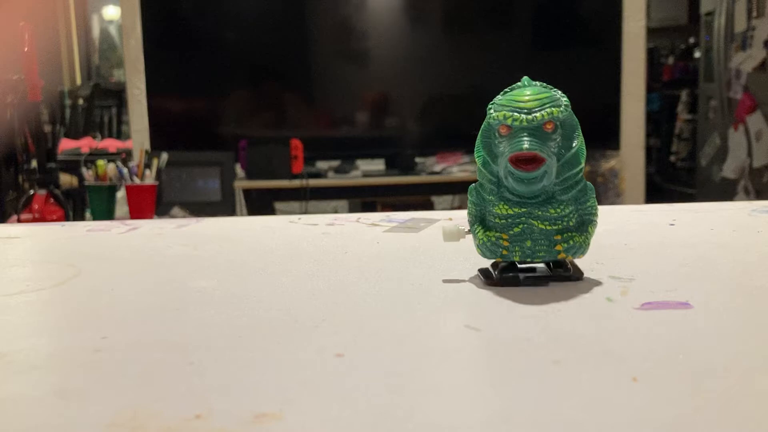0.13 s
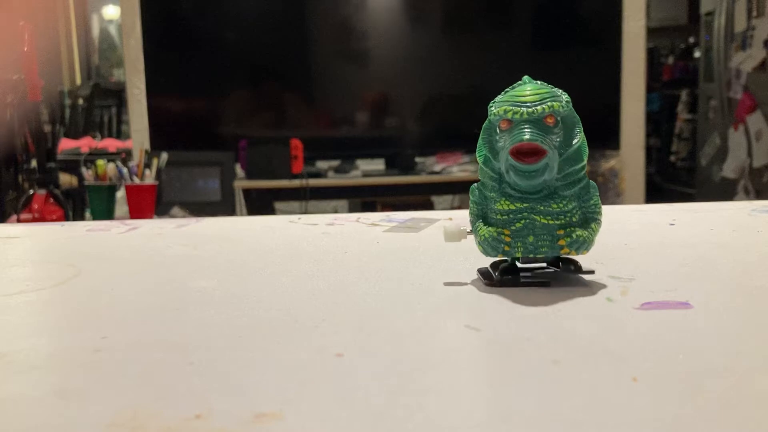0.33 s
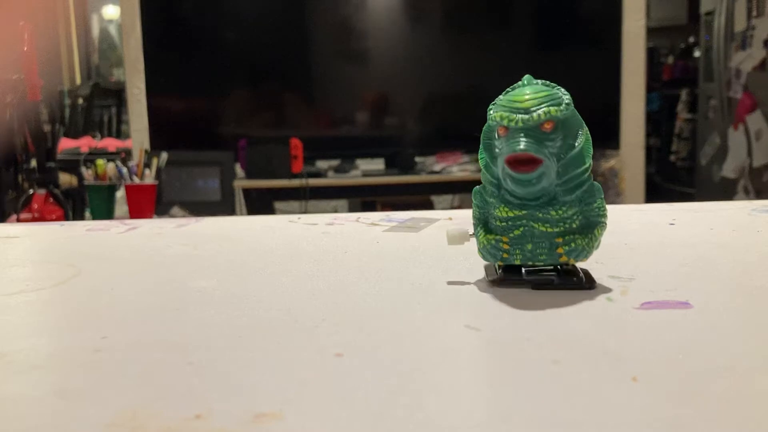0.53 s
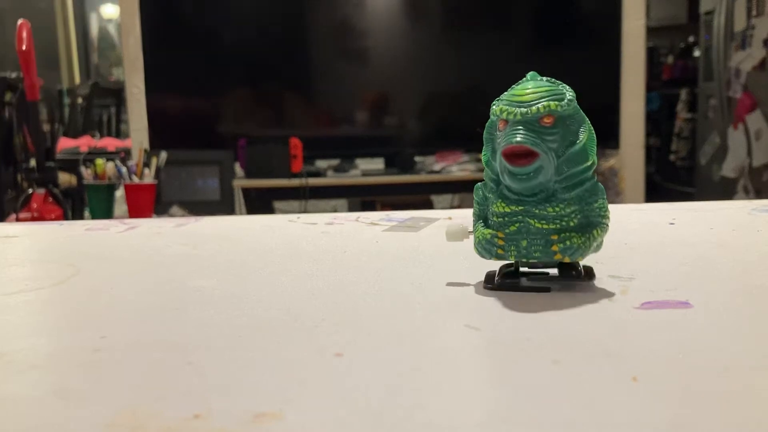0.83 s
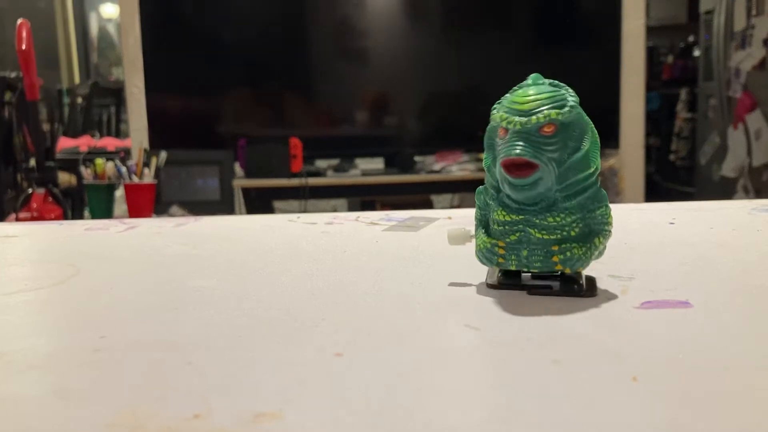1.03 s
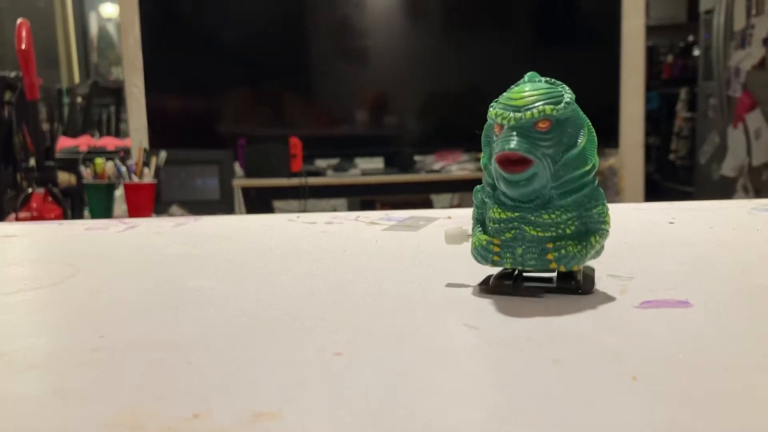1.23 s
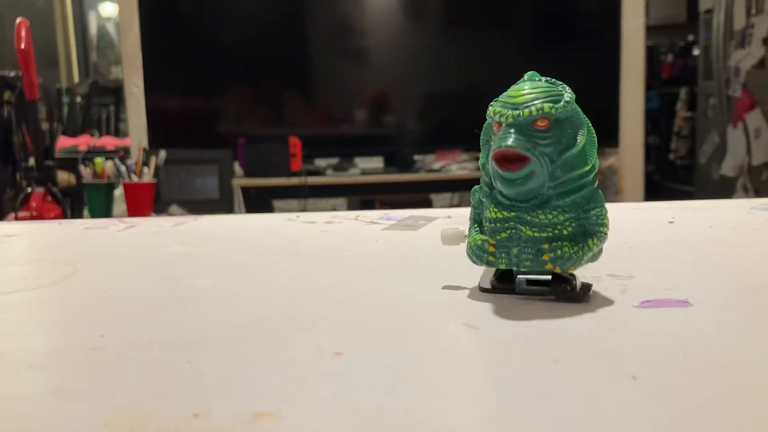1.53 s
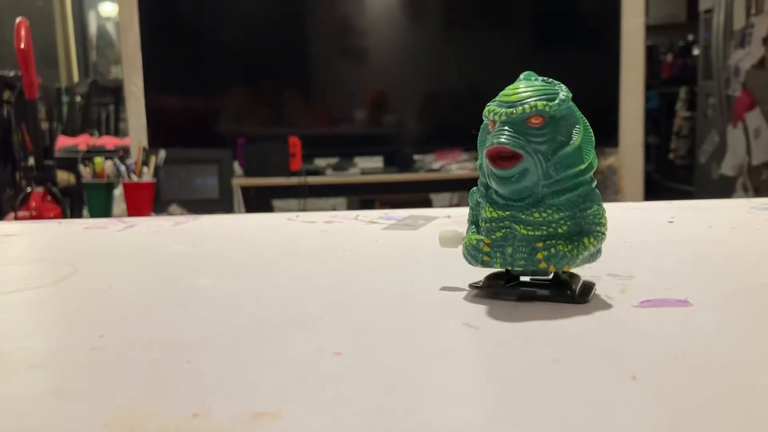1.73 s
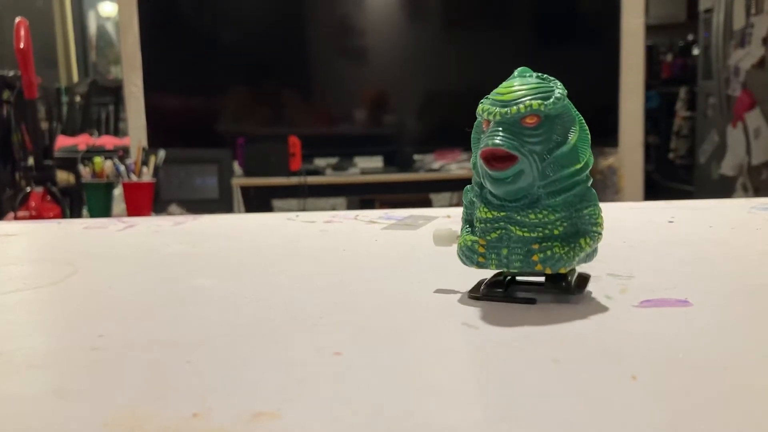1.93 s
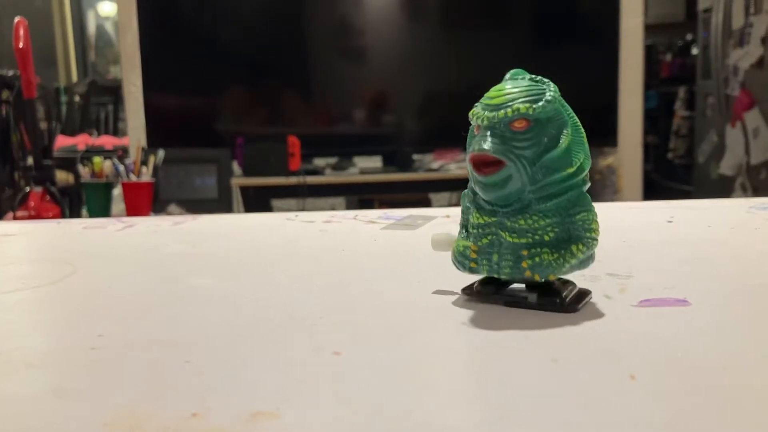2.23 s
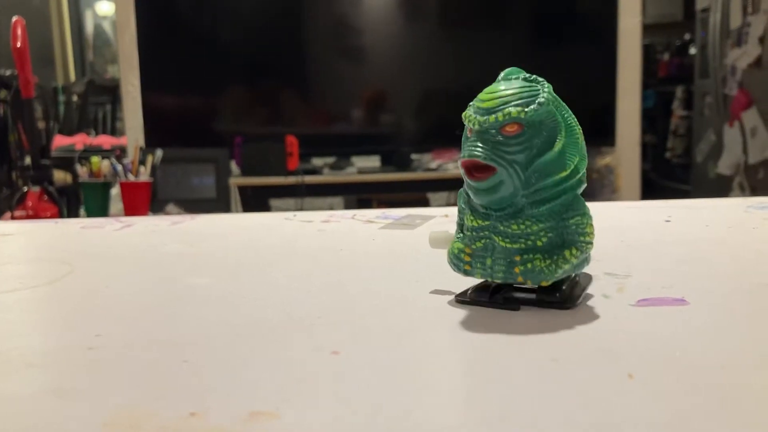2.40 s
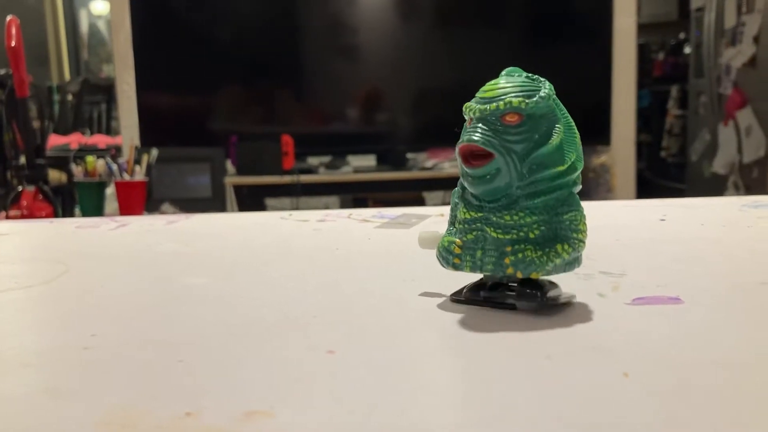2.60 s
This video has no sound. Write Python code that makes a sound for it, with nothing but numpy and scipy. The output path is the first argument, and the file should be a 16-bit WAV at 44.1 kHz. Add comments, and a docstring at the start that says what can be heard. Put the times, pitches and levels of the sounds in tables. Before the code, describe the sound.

Continuous bright, rattling clockwork buzz of a small walking toy, starting abruptly and running throughout, with brief stalls and snaps at each step; close and dry, slight table reflection, very faint indoor hum behind.

```python
"""A small plastic wind-up toy waddles on a table, close to a two-port microphone in a quiet room. Its
escapement rocks about 147 times a second, two blows per tooth ringing in the hollow shell and the table. Twice
in every step the gears almost stall, then catch again with a snap; wavering gear tones follow the speed. The
blows are short noise rings with rattle and rubbing, heard directly, off the table and as a diffuse stereo wash.
Behind the toy lie a low room rumble, made of shaped noise, and steady mains hum, made of sines."""
import sys
import numpy as np
from scipy import signal
from scipy.fft import rfft, irfft, next_fast_len
from scipy.io import wavfile

SR = 44100
rng = np.random.default_rng(int(sys.argv[2]) if len(sys.argv) > 2 else 0)


def master(y):
    """Save y as 16-bit WAV."""
    cut = np.clip(np.atleast_2d(y).T, -1, 1)
    pcm = np.round(cut * 32767)  # scale
    wavfile.write(sys.argv[1], SR, pcm.astype(np.int16))


N = 121716

# escapement speed, surging and sagging several times a step: (time [s], speed [teeth/s])
ESCAPEMENT_SPEED = [(0.08, 149), (0.14, 149), (0.17, 141), (0.22, 151), (0.3, 160), (0.34, 147),
                    (0.395, 159), (0.429, 146), (0.584, 155), (0.649, 142), (0.724, 143), (0.849, 155),
                    (0.893, 139), (0.943, 157), (0.983, 143), (1.043, 151), (1.143, 148), (1.228, 140),
                    (1.253, 146), (1.273, 137), (1.402, 157), (1.457, 147), (1.522, 153), (1.547, 140),
                    (1.637, 157), (1.682, 146), (1.702, 153), (1.771, 140), (1.796, 150), (1.841, 138),
                    (1.901, 152), (1.976, 153), (2.016, 138), (2.076, 157), (2.106, 134), (2.151, 153),
                    (2.195, 138), (2.265, 145), (2.35, 136), (2.385, 140), (2.41, 135), (2.555, 151),
                    (2.59, 133), (2.659, 150), (2.689, 136), (2.739, 140)]
# gears binding and catching: (release time [s], depth [dB], length of slowing [s], snap of the catch [dB])
GEAR_STALLS = [(.473, 16, .015, -9), (.525, 16, .018, 1), (1.027, 10, .016, -10), (1.085, 16, .026, -3),
               (1.590, 15, .018, -6), (1.646, 18, .02, -1), (2.154, 11, .018, -6), (2.2099, 23, .017, -1),
               (2.738, 19, .018, 1)]
# low knocking, below 1550 Hz: (time [s], level [dB])
KNOCK_LEVEL = [(0.08, -1.8), (1.0, 1), (2.75, .5)]
# rasp near 2 kHz: (time [s], level [dB])
RASP_LEVEL = [(0.08, 2.5), (0.41, 3.4), (0.68, -1.5), (1.52, -1), (2.36, -2.9), (2.39, 0.7), (2.75, -4)]
# clatter of the shell: (time [s], level [dB])
CLATTER_LEVEL = [(0.08, -.5), (0.32, 1.8), (0.71, -1.5), (0.86, 2.5), (0.89, -0.1), (1.19, -2.5), (1.37, 1),
                 (1.61, -1.5), (1.85, -1.7), (1.97, 2.5), (2.0, -0.7), (2.42, -2.4), (2.54, 3),
                 (2.61, -2.5)]
# bright buzz: (time [s], level [dB])
BUZZ_LEVEL = [(0.08, -0.9), (0.38, 1.5), (0.44, -1.8), (0.47, 3), (0.74, -2.5), (1.25, 1.3), (1.28, -4.5),
              (1.4, 0.5), (1.46, -1.55), (1.701, 2.8), (1.85, -2.5), (1.97, 1), (2.21, 0.5), (2.45, -1.5),
              (2.54, 1), (2.75, -1.9)]
# finest ticks, above 8800 Hz: (time [s], level [dB])
TICK_LEVEL = [(0.08, -3.4), (0.17, -6), (0.319, -1.5), (0.5, -4), (0.59, -1.4), (0.65, -6), (0.829, 1),
              (1.28, -1.8), (1.4, 1), (1.7, 0.7), (1.76, -2.5), (1.94, 0.5), (2.39, -0.5), (2.45, 2.5),
              (2.6, 1.3), (2.72, 4.5)]
# broad colour of toy and table: (frequency [Hz], relative density [dB per Hz])
BODY_COLOUR = [(250, -27.5), (490, -30.5), (750, -16.5), (1000, -12.5), (1400, -12), (1700, -19.5),
               (2200, -18.5), (3050, -19.5), (3600, -16), (4400, -1), (5200, -14), (5900, -5), (8600, -10),
               (10500, -2.5), (12500, -7.5), (15700, -14)]
# resonances of toy and table: (frequency [Hz], width [Hz], lift [dB])
BODY_RESONANCES = [(617, 76, 7.5), (828, 47, 6), (875, 84, 6), (2700, 310, 7.3), (4064, 110, 5.5),
                   (4450, 107, 4.5), (4795, 64, 6), (6635, 130, 6.5), (7740, 250, 3.5), (11370, 350, 4)]
# rings that swell and fade as the toy turns: (frequency [Hz], width [Hz], lift as (time [s], level [dB]))
TURNING_RINGS = [(2850, 180, [(.6, 4), (1.2, 0)]), (4300, 220, [(.32, 5), (.55, -1.5)]),
                 (4750, 220, [(.8, -5), (1.4, 1)]), (5900, 300, [(.33, 5), (.55, -3), (1.1, -6)]),
                 (6600, 200, [(.35, -4), (.55, 3), (.9, -2), (1.15, 2), (1.8, 3), (2.2, -6)]),
                 (7050, 220, [(1.9, -2), (2.3, 4)]), (7780, 220, [(.5, -5), (1.2, 3), (2.4, -1)])]
# phase between the microphone ports: (frequency [Hz], lead of the left port [rad])
PORT_LEAD = [(300, 0), (1500, .1), (1950, 1.5), (2650, .05), (3300, 1.6), (4000, 1.9), (4500, 2.8),
             (4900, 1.4), (5400, 1.5), (5950, 1.9), (6600, 1.1), (7400, .05), (8000, -1.1), (8500, -3.05),
             (9500, -3.2), (9750, -4.1), (11300, -6.28), (12400, -7.4), (13000, -8.1), (13300, -9.35),
             (14450, -9.5), (14700, -10.6), (15400, -12.3)]
# diffuse stereo wash against the direct sound: (frequency [Hz], level [dB])
WASH_LEVEL = [(300, -11), (900, -13.5), (2000, -7), (2700, -10), (3500, -6.5), (4500, -10.5),
              (5400, -6.5), (6500, -8), (7800, -13), (8600, -38), (9450, -39), (10200, -19),
              (11300, -24), (12600, -12), (13400, -34), (14400, -28), (15500, -24)]
# tones of the gear train: (multiple of the tooth rate, level before wavering and stalls [dB])
GEAR_TONE_LEVELS = [(4, -64.5), (5, -61), (6, -54), (7, -62.5), (9, -65)]
# room rumble: (frequency [Hz], relative density [dB per Hz])
RUMBLE_COLOUR = [(24, -42), (40, -16), (65, -3), (85, -2), (150, -2), (220, -9.5), (450, -10), (1000, -17),
                 (4000, -39)]
# mains hum: (frequency [Hz], level midway between the ports [dB])
MAINS_HUM = [(120, -59.5), (238, -70)]

TOY_DB = -31.5
RETURN_SHARE = .43   # the second pallet strikes this far into the tooth
JITTER_S, STRIKE_SPREAD_DB = .00009, 1.04   # standard deviations of timing and force
CATCH_S = .00067   # longest time the gears take to pick up again
BLOW_LIMIT = 3.76   # soft limit on the force of contact, in multiples of the rms
ECHO_S, ECHO_SWAY_S, ECHO_DB = .0011, .00012, -13.5   # bounce off the table
STEP_S = .563   # one rocking cycle
WASH_T60_S = .12
GEAR_WAVER_DB, GEAR_WAVER_PER_S, GEAR_SLOP_RAD = 2.5, 45, .3   # level spread, rate, phase spread
RUMBLE_DB, RUMBLE_SIDE_DB = -60.5, -7.5   # the side part is relative to the middle
START_S, CUTOFF_HZ = .073, 15780

T = np.arange(N) / SR
SIZE = next_fast_len(N + SR // 2)
HZ = np.arange(SIZE // 2 + 1) * SR / SIZE + 1e-6


def from_db(db):
    """Decibels to gain."""
    return 10 ** (np.asarray(db) / 20)


def rms_one(x):
    """Scale to unit rms."""
    return x / np.sqrt(np.mean(x ** 2) + 1e-20)


def in_time(rows, s):
    """Read a curve at the given times."""
    return np.interp(s, *np.transpose(rows))


def over_hz(rows):
    """Read a spectrum on the frequency grid, along a logarithmic axis."""
    hz, value = np.transpose(rows)
    return np.interp(np.log(HZ), np.log(hz), value)


def teeth():
    """Teeth passed since the start: the running sum of the escapement speed."""
    return np.cumsum(in_time(ESCAPEMENT_SPEED, T)) / SR


def strikes():
    """Times, levels and pallet (0 or 1) of the escapement's blows; stalls weaken them and end with a snap."""
    k = np.arange(900)   # more than enough blows; those past the end are dropped
    pallet = k % 2
    chance = rng.standard_normal((len(k), 2))
    s = np.interp(k // 2 + RETURN_SHARE * pallet, teeth(), T, right=2 * T[-1])
    s = s + JITTER_S * chance[:, 0]
    db = STRIKE_SPREAD_DB * chance[:, 1] + stall_db(s)
    snaps = [(release, snap_db, 0) for release, _, _, snap_db in GEAR_STALLS]
    rows = np.vstack([np.column_stack([s, db, pallet]), snaps])
    return rows[(rows[:, 0] > 0) & (rows[:, 0] < T[-1])].T


def even_ring(decay):
    """A short ring of noise whose spectrum is even, shaped towards the given decay."""
    ring = rng.standard_normal(len(decay))
    for _ in range(8):   # alternate between the decay in time and a flat spectrum
        spectrum = rfft(np.sign(ring) * decay)
        ring = irfft(np.exp(1j * np.angle(spectrum)))
    return ring


def register(blows, level, lag_s, ring_s, return_db, spread_db, loose, rub_db):
    """Blows give one repeated ring and a loose rattle over rubbing gears; rows: direct, left and right wash."""
    s, db, pallet = blows
    blow_db = db + return_db * pallet + spread_db * rng.standard_normal(N)[:len(s)]
    clicks = np.zeros(N)
    clicks[np.clip(((s + lag_s) * SR).astype(int), 0, N - 1)] = from_db(blow_db)
    age = T[:2048]
    decay = np.exp(-age / ring_s) * (1 - np.exp(-6 * age / ring_s))
    firm = rms_one(signal.fftconvolve(clicks, even_ring(decay))[:N])
    rattle_power = abs(signal.fftconvolve(clicks ** 2, decay ** 2)[:N])
    rattle = rms_one(np.sqrt(rattle_power) * rng.standard_normal(N))
    rub = from_db(rub_db + stall_db(T)) * rng.standard_normal(N)
    contact = rms_one(np.sqrt(1 - loose) * firm + np.sqrt(loose) * rattle + rub)
    limited = rms_one(np.tanh(contact / BLOW_LIMIT))
    direct = limited * from_db(in_time(level, T))
    return rfft(np.vstack([with_table_echo(direct), stereo_wash(direct)]), SIZE)


def body():
    """Response of shell and table: a broad colour lifted by resonances; unit power."""
    response = from_db(over_hz(BODY_COLOUR)) + 0j
    for hz, width, db in BODY_RESONANCES:
        response = response * (1 + (from_db(db) - 1) / (1 + 2j * (HZ - hz) / width))
    return response / np.sqrt(np.mean(abs(response) ** 2))


def toy():
    """Spectrum of the blows in five registers of the body; the finest ticks come first and die fastest."""
    blows = strikes()
    registers = [
        register(blows, KNOCK_LEVEL, lag_s=.0002, ring_s=.0016, return_db=-2, spread_db=1,
                 loose=.25, rub_db=-11),
        register(blows, RASP_LEVEL, lag_s=.00023, ring_s=.0012, return_db=-6.5, spread_db=.5,
                 loose=.3, rub_db=-20.5),
        register(blows, CLATTER_LEVEL, lag_s=.0003, ring_s=.0019, return_db=-8, spread_db=1.01,
                 loose=.35, rub_db=-9),
        register(blows, BUZZ_LEVEL, lag_s=.0001, ring_s=.00145, return_db=-4, spread_db=1.4,
                 loose=.34, rub_db=-11),
        register(blows, TICK_LEVEL, lag_s=0, ring_s=.00075, return_db=-.6, spread_db=2,
                 loose=.6, rub_db=-8)]
    # share of power below each crossover [Hz]; neighbours differ by one register
    crossovers = [1 / (1 + (HZ / hz) ** 16) for hz in (1550, 2450, 5300, 8800)]
    below = [0 * HZ] + crossovers + [1 + 0 * HZ]
    bands = [np.sqrt(abs(hi - lo)) for lo, hi in zip(below, below[1:])]
    return from_db(TOY_DB) * body() * sum(r * band for r, band in zip(registers, bands))


def with_table_echo(x):
    """Add the bounce off the table, a comb whose path shifts as the toy rocks."""
    lag = ECHO_S + ECHO_SWAY_S * np.sin(2 * np.pi * T / STEP_S)
    echo = from_db(ECHO_DB) * np.interp(T - lag, T, x, left=0)
    return (x + echo) / np.hypot(1, from_db(ECHO_DB))


def stereo_wash(x):
    """A short diffuse stereo wash that follows the power of the sound, different at each port."""
    r = from_db(-120 / (WASH_T60_S * SR))   # power kept per sample: 60 dB lost in the decay time
    power = signal.lfilter([1 - r], [1, -r], x ** 2)
    return np.sqrt(power) * rng.standard_normal((2, N))


def shifting_rings(x):
    """As the toy turns, single resonances of the shell come forward or recede."""
    spectrum = rfft(x, SIZE)
    for hz, width, level in TURNING_RINGS:
        band = irfft(spectrum / (1 + 2j * (HZ - hz) / width), SIZE)[:, :N]
        x = x + (from_db(in_time(level, T)) - 1) * band
    return x


def gear_hum():
    """Rough, wavering tones locked to the tooth rate, radiated by the table."""
    turn = 2 * np.pi * teeth()

    def waver():
        """A random curve that drifts in straight lines."""
        return np.interp(T * GEAR_WAVER_PER_S, np.arange(N), rng.standard_normal(N))

    tones = 0
    for multiple, db in GEAR_TONE_LEVELS:
        gain = from_db(db + GEAR_WAVER_DB * waver())
        phase = multiple * turn + 2 * np.pi * rng.random() + GEAR_SLOP_RAD * waver()
        tones = tones + gain * np.sin(phase)
    return np.sqrt(2) * from_db(stall_db(T)) * tones


def room_rumble():
    """Shaped low noise, mostly common to both ports, with a weaker part of opposite sign."""
    noise = rfft(rng.standard_normal((2, SIZE)))
    mid, side = irfft(noise * from_db(over_hz(RUMBLE_COLOUR)), SIZE)[:, :N]
    return from_db(RUMBLE_DB) * rms_one(mid + from_db(RUMBLE_SIDE_DB) * side * np.array([[1], [-1]]))


def mains_hum():
    """Steady sines, slightly stronger at the right port."""
    hum = sum(np.sqrt(2) * from_db(db) * np.sin(2 * np.pi * (hz * T + rng.random()))
              for hz, db in MAINS_HUM)
    return hum * from_db([[-.6], [.6]])


def stall_db(s):
    """Drive sinks as the gears bind and returns almost at once when they let go."""
    total = 0
    for release, depth, length, _ in GEAR_STALLS:
        corners = [release - length, release - length / 3, release - min(CATCH_S, length / 4), release]
        total = total + np.interp(s, corners, [0, -depth, -depth, 0])
    return total


def scene():
    """The toy reaches the two ports directly and as a diffuse stereo wash, over rumble and hum."""
    ports = np.exp(.5j * over_hz(PORT_LEAD) * np.array([[1], [-1]]))   # half the phase on each side
    paths = toy()
    direct = paths[0] * ports
    wash = paths[1:] * from_db(over_hz(WASH_LEVEL))
    clicks = irfft(direct + wash, SIZE)[:, :N]
    return shifting_rings(clicks) + gear_hum() + room_rumble() + mains_hum()


def record(dry):
    """The sound cuts in after a brief silence; a steep low-pass removes the top."""
    low_pass = signal.ellip(12, .1, 80, CUTOFF_HZ, fs=SR, output="sos")
    return signal.sosfilt(low_pass, dry * (T > START_S))


dry = scene()
out = record(dry)
master(out)
```